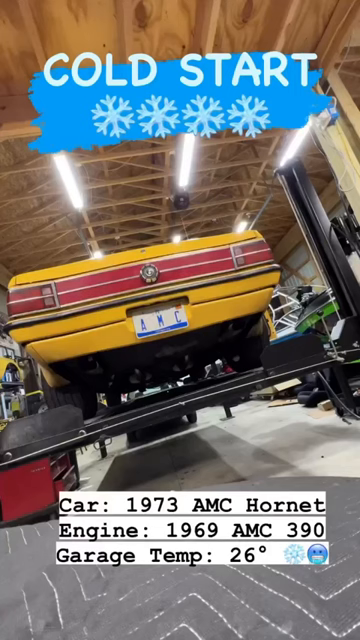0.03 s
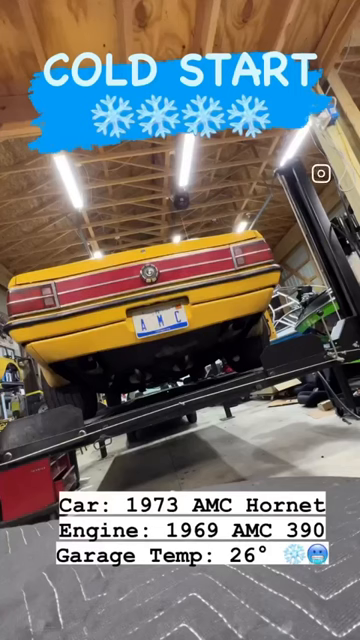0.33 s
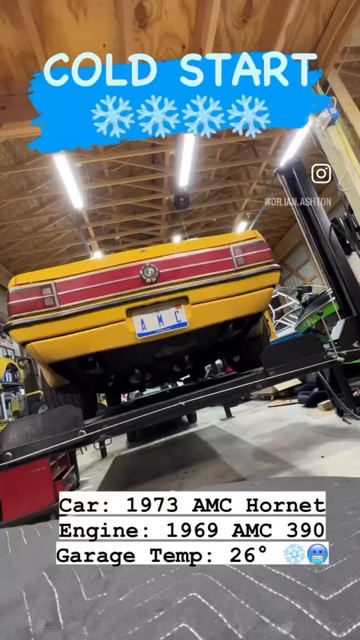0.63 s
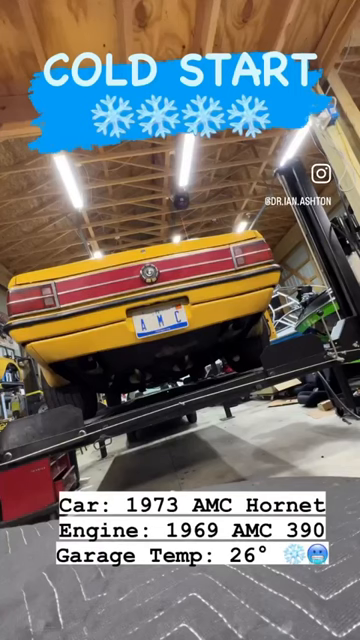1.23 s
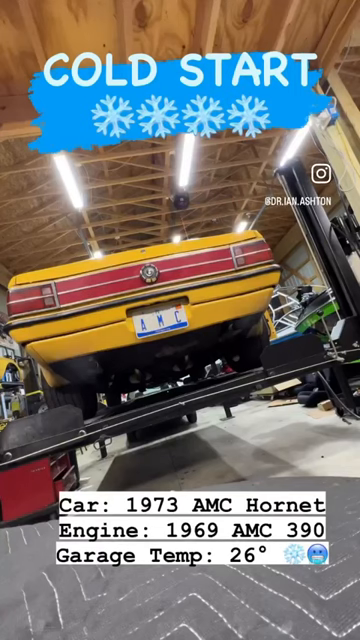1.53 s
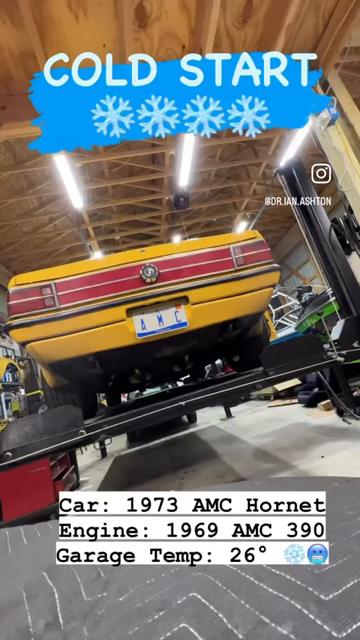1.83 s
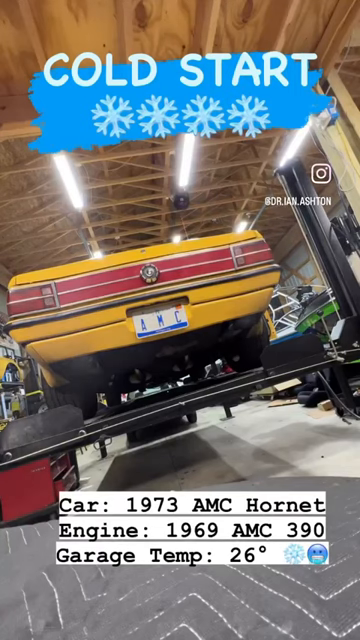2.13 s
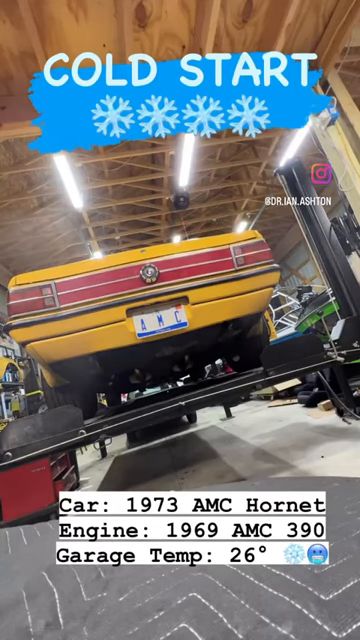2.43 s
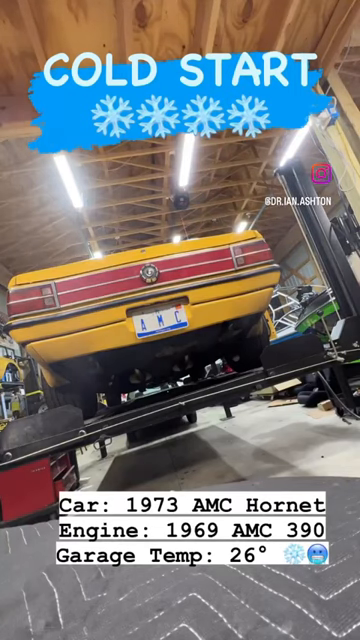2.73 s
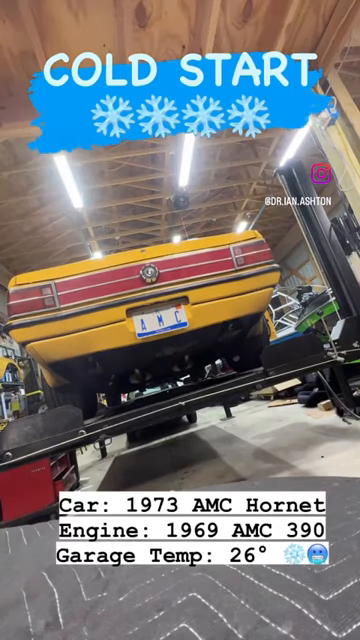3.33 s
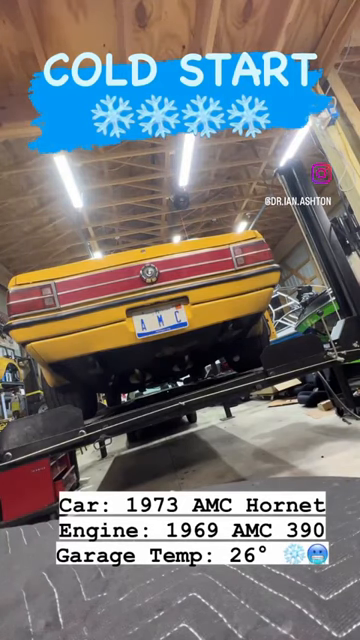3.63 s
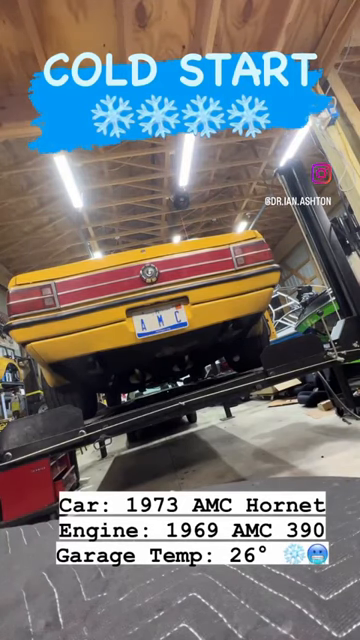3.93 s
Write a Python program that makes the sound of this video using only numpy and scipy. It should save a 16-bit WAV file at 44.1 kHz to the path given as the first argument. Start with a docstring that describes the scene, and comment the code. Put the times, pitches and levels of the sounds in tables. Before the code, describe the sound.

A big car engine cranks, catches and settles into a loud, lumpy idle in a garage.

```python
"""Cold V8 starting in a garage

Heard from behind the tailpipes, the starter's switch (the solenoid) clacks, and the starter whines in
surges as it pushes against the air squeezed in the cylinders. The engine catches, stumbles and settles
into a lumpy fast idle. Each firing thumps down the pipes with a bark and a hiss of gas; some bang out,
and sharp ticks come between."""
import sys
import numpy as np
from scipy import signal
from scipy.fft import rfft, irfft
from scipy.io import wavfile
from scipy.ndimage import uniform_filter1d, map_coordinates

SR = 44100
rng = np.random.default_rng(int(sys.argv[2]) if len(sys.argv) > 2 else 0)


def store_wav(level_fs):
    """Save 16-bit WAV to argv[1]."""
    pcm = np.round(np.clip(np.atleast_2d(level_fs), -1, 1) * 32767)
    wavfile.write(sys.argv[1], SR, pcm.T.astype(np.int16))


N = 176400
T = np.arange(N) / SR
FREQ = np.maximum(np.arange(N + 1) * SR / (2 * N), 1.)

# How fast the cylinders fire once the engine idles: time_s, firings_per_s
IDLE_RATE = [(1.72, 52.31), (1.87, 63.48), (2.0, 67.08), (2.2, 64.9), (2.38, 71.01), (2.52, 66.56),
             (2.72, 66.96), (2.87, 70.13), (3.0, 68.79), (3.15, 72.64), (3.35, 70.78), (3.48, 66.76),
             (3.62, 74.07), (3.75, 72.08), (3.87, 68.77), (4.0, 73.1)]


def undb(db):
    """Turn decibels into a gain to multiply by."""
    return 10 ** (np.asarray(db) / 20)


def unit(x):
    """Scale a signal to an average (rms) level of 1."""
    return x / np.sqrt(np.mean(x ** 2) + 1e-18)


def curve(rows, column=1):
    """Join one column of a table by straight lines in time."""
    rows = np.array(rows)
    return np.interp(T, rows[:, 0], rows[:, column])


def fader(rows, column=1):
    """Gain that follows a dB column from the first row until just after the last, silent elsewhere."""
    is_on = (T >= rows[0][0]) & (T <= rows[-1][0] + .03)
    return undb(curve(rows, column)) * uniform_filter1d(1. * is_on, size=200)


def per_hz(points):
    """Join (Hz, value) points, giving every octave the same room."""
    hz, value = np.array(points).T
    return np.interp(np.log(FREQ), np.log(hz), value)


def shape(x, response):
    """Filter a signal with one gain for each frequency."""
    return irfft(rfft(x, 2 * N) * response)[..., :N]


def colour(x, points):
    """Filter through (Hz, dB) points so that the peaks ring after a blow, never before it."""
    cepstrum = irfft(np.log(undb(per_hz(points))))
    one_sided = np.r_[cepstrum[0], 2 * cepstrum[1:N]]
    return shape(x, np.exp(rfft(one_sided, 2 * N)))


def resonance(hz, width):
    """Response of something that rings at one pitch, with gain 1 at that pitch."""
    return 1 / (1 + 1j * (FREQ ** 2 - hz ** 2) / (FREQ * width))


def noise(side_db):
    """Stereo noise, alike in both ears in the bass and the very top; more side_db makes it wider."""
    mid, side = rng.standard_normal((2, N))
    side = shape(side, undb(side_db) * FREQ / np.hypot(FREQ, 500) / (1 + (FREQ / 12900) ** 4))
    return np.array([mid + side, mid - side])


def wander(rate_hz):
    """A smooth random wobble with a typical size of 1."""
    window = int(SR / rate_hz)
    return unit(uniform_filter1d(uniform_filter1d(rng.standard_normal(N), window), window))


def strikes(times, sizes):
    """A single click at each time."""
    return np.bincount(np.clip(times * SR, 0, N).astype(int), sizes, N + 1)[:N]


def puffs(times, levels_db, decay_s, steady, rise_s=.0023):
    """A gas flow that swells at each time and dies back to a steady stream."""
    swell = signal.lfilter([1], [1, -np.exp(-1 / (rise_s * SR))], strikes(times, undb(levels_db)))
    flow = signal.lfilter([1], [1, -np.exp(-1 / (decay_s * SR))], swell)
    return unit(unit(flow) + steady)


def garage(x, echo_db=-2, echo_s=.37):
    """The direct sound plus a short echo from walls and floor, mostly above the bass."""
    tail = noise(side_db=-3) * undb(-60 * T / echo_s) * (T > .005)
    tail /= np.sqrt(np.sum(tail ** 2) / 2)
    echo_gain = undb(echo_db) * FREQ ** 2 / (FREQ ** 2 + 308 ** 2)
    return shape(x, (1 + echo_gain * rfft(tail, 2 * N)) / np.hypot(1, echo_gain))


def room_rumble():
    """The faint, steady, low noise of the room."""
    # Tone of the room's air: frequency_hz, level_db
    tone = [(15, -60), (25, -24), (43, -4), (124, -0.5), (156, -12), (323, -13), (527, -19.5), (839, -19),
            (1870, -40), (12000, -64), (15600, -94), (22000, -120)]
    return undb(-56) * unit(colour(noise(side_db=1), tone))


def clacks():
    """The solenoid pulls in, then the starter's small gear hits the engine's big one; the metal rattles."""
    # The blows: start_s, level_db, decay_s, tilt_db_per_octave
    blows = [(0.551, -31.5, 0.19, 2), (0.617, -24.5, 0.022, -1.5), (0.631, -17, 0.1, -5.5)]
    # Tone of the rattle: frequency_hz, level_db
    tone = [(35, -75), (60, -22), (282, -15), (526, 0.5), (591, -2), (727, 4.5), (835, 1), (1560, -3.5),
            (1710, -7.5), (2980, -4), (3840, -17), (4210, -15.5), (15000, -34)]
    # Ringing of the solenoid and small gear: pitch_hz, width_hz, level_db
    rings = [(1150, 200, -5), (2950, 170, -2), (4200, 130, 6)]
    ringing = 1 + sum(undb(db) * resonance(hz, width) for hz, width, db in rings)
    out = 0
    for start_s, level_db, decay_s, tilt_db in blows:
        tilted = [(hz, db + tilt_db * np.log2(hz)) for hz, db in tone]
        rattle = unit(shape(colour(noise(side_db=-5.5), tilted), ringing))
        out = out + undb(level_db) * rattle * (T >= start_s) * np.exp(-abs(T - start_s) / decay_s)
    return out


def starter():
    """Gear teeth whine in surges and ring the housing, while the unfired cylinders pump air."""
    # Whine of the gear teeth: time_s, pitch_hz, level_db
    surges = [(.62, 850, -56), (.675, 923, -22), (.685, 970, -12.5), (.74, 1030, -17), (.79, 1103, -8),
              (.822, 1096, -8), (.838, 1057, -46), (.852, 996, -23), (.875, 882.7, -25), (.9, 836, -15.5),
              (.99, 814.8, -26), (1.003, 1236, -13), (1.022, 1253, -22.5), (1.046, 1165, -29),
              (1.063, 1090, -9), (1.095, 1028, -25.5), (1.12, 1000, -26), (1.16, 1357, -26),
              (1.2, 1263, -14.5), (1.213, 1157, -28), (1.226, 1080, -7.5), (1.238, 1043, -19.5),
              (1.275, 995, -32), (1.34, 1073, -21), (1.38, 1000, -33)]
    # Overtones of the whine: pitch_multiple, level_db
    tooth_overtones = [(2, -8.5), (3, -8.5), (4, -12)]
    # Loudness of the gears' rasp and overtones: time_s, level_db
    rasp_level = [(.605, -70), (.622, -30), (.632, -20), (.69, -20.5), (.78, -19), (.9, -21.5),
                  (1.0, -22.5), (1.2, -20), (1.29, -21), (1.345, -17.5), (1.42, -32), (1.5, -52)]
    # Tone of the rasp: frequency_hz, level_db
    rasp_tone = [(40, -34), (120, -20.5), (350, -14.5), (520, -2.5), (700, -6.5), (1000, 3.5), (1130, -8),
                 (1420, -7.5), (1650, -13), (2400, -10.5), (3100, -9.5), (3900, -16), (5000, -18),
                 (6300, -17.5), (8000, -23), (11500, -21), (15000, -33.5)]
    # Loudness of the pumping: time_s, level_db
    pump_level = [(.61, -70), (.66, -43), (.72, -33), (.77, -27), (.87, -48), (.95, -35.5), (1.1, -39),
                  (1.2, -53), (1.3, -41), (1.36, -62)]
    # Ringing of the flywheel and its housing: pitch_hz, width_hz, level_db
    rings = [(1070, 64, 6), (1630, 46, 0), (2150, 130, -8), (3015, 62, -7), (3080, 49, -16)]
    tooth_phase = 2 * np.pi * np.cumsum(curve(surges) * (1 + .013 * wander(250))) / SR
    load = fader(surges, column=2) * undb(3 * wander(250))
    whine = np.sin(tooth_phase) * load * undb([[-3.5], [2.5]])  # louder on the right
    steadier_phase = 2 * np.pi * np.cumsum(curve(surges) * (1 + .004 * wander(250))) / SR
    overtones = fader(rasp_level) * sum(undb(db) * np.sin(k * steadier_phase) for k, db in tooth_overtones)
    grind = (1 + .7 * np.sin(tooth_phase)) * undb(2 * wander(360))  # swells with each tooth
    rasp = unit(colour(noise(side_db=-4) * grind, rasp_tone)) * fader(rasp_level) * undb(-4)
    pump_hz = 59 * (1 + .078 * wander(30.2))
    pump = np.sin(2 * np.pi * np.cumsum(pump_hz) / SR) * fader(pump_level)
    housing = shape(overtones + rasp, sum(undb(db) * resonance(hz, width) for hz, width, db in rings))
    return garage(whine, echo_db=-2.5) + garage(rasp + housing + pump)


def ticks(decay_s=.002, width_hz=1000, faint_per_s=14, faint_db=-28):
    """Brief metal ticks, each ringing at its own pitch and a shared one; fainter ones fall by chance."""
    # The sharp ticks: start_s, level_db, pitch_hz
    sharp = [(1.838, -19, 6300), (1.902, -23, 6600), (1.978, -21, 7700), (2.096, -23, 6600),
             (2.220, -21, 9300), (2.380, -18, 9100), (2.395, -19, 6700), (2.497, -22, 6400),
             (2.525, -24, 9200), (2.587, -22, 8600), (2.632, -21, 6400), (2.691, -22, 9200),
             (2.735, -24, 6300), (2.811, -21, 7300), (2.840, -21, 8300), (2.870, -22, 6800),
             (3.041, -24, 9400), (3.207, -22, 6600), (3.263, -25, 6700), (3.375, -23, 8300),
             (3.419, -18, 9200), (3.552, -20, 7100), (3.827, -23, 6400), (3.873, -24, 8800)]
    shared_hz, shared_db = 6240, -14
    out, grit = np.zeros((2, N)), noise(side_db=-20)
    idle_start_s, pitches = IDLE_RATE[0][0], np.array(sharp)[:, 2]
    idle_s = T[-1] - idle_start_s
    faint = [(idle_start_s + when * idle_s, faint_db, pitches.min() + height * np.ptp(pitches))
             for when, height in rng.random((int(faint_per_s * idle_s), 2))]
    for start_s, level_db, pitch_hz in sharp + faint:
        span = (T >= start_s) & (T < start_s + .03)
        burst = grit[:, span] * np.exp((start_s - T[span]) / decay_s)
        for ring_hz, ring_db in (pitch_hz, 0), (shared_hz, shared_db):
            ring = signal.iirpeak(ring_hz, ring_hz / width_hz, SR)
            out[:, span] += undb(level_db + ring_db) * signal.lfilter(*ring, signal.lfilter(*ring, burst))
    return out * undb(1) * np.sqrt(SR / np.pi / width_hz)  # makes up for the narrow filters


def gas_hiss(times, levels_db, split_hz=4910):
    """Gas rushes out at each firing: a lower rasp and a higher hiss, each with its own loudness."""
    # Tone of the rushing gas: frequency_hz, level_db
    tone = [(500, -22), (1300, -1.5), (2100, -4), (3000, -1), (3900, 1.5), (5000, -2.5), (6400, 3),
            (7400, -1), (9200, -3), (9900, -5), (11500, -3.5), (15500, -7)]
    # Loudness of the lower, rasping part: time_s, level_db
    rasp_level = [(1.32, -35), (1.37, -23.5), (1.4, -29), (1.52, -29), (1.6, -34.5), (1.7, -38.5),
                  (1.75, -33.5), (1.84, -34), (1.89, -37), (1.93, -34), (1.97, -40.5), (2.03, -32.5),
                  (2.08, -39.5), (2.13, -35), (2.21, -40.5), (2.33, -33.5), (2.4, -39), (2.44, -37.5),
                  (2.55, -39.5), (2.62, -39.5), (2.65, -36), (2.73, -37.5), (2.87, -36.5), (3.03, -43),
                  (3.08, -35.5), (3.16, -36), (3.25, -46), (3.29, -36.5), (3.38, -36), (3.48, -44),
                  (3.57, -36.5), (3.61, -40.5), (3.72, -36), (3.82, -42), (3.9, -39), (4, -36.5)]
    # Loudness of the higher, hissing part: time_s, level_db
    hiss_level = [(1.32, -37), (1.37, -20.5), (1.43, -26.5), (1.53, -30.5), (1.62, -37.5), (1.66, -40),
                  (1.71, -39), (1.76, -30.5), (1.84, -31), (1.89, -35), (2.04, -32.5), (2.08, -35),
                  (2.16, -31.5), (2.21, -37.5), (2.33, -31.5), (2.44, -36.5), (2.54, -34), (2.76, -34),
                  (2.83, -32.5), (3.02, -38.5), (3.06, -34.5), (3.16, -34), (3.25, -38), (3.29, -35.5),
                  (3.38, -30.5), (3.48, -42), (3.56, -33), (3.61, -38), (3.74, -35), (3.81, -39.5),
                  (3.86, -37.5), (3.93, -37), (4, -33)]
    gas = unit(colour(noise(side_db=-6.5) * puffs(times, levels_db, decay_s=.012, steady=.082), tone))
    low_pass = 1 / (1 + (FREQ / split_hz) ** 10)
    rasp = unit(shape(gas, low_pass)) * fader(rasp_level)
    hiss = unit(shape(gas, 1 - low_pass)) * fader(hiss_level)
    return rasp + undb(-.5) * hiss


def gas_bark(times, levels_db):
    """Each firing pushes out a short, throaty puff of gas."""
    # Tone of the bark: frequency_hz, level_db
    tone = [(60, -13.5), (150, 4), (320, -4.5), (400, -6), (480, -1.5), (720, -6), (950, -16.5),
            (1200, -24), (1600, -24), (2200, -53), (6000, -45)]
    # Loudness of the bark: time_s, level_db
    level = [(1.33, -22), (1.35, -27), (1.39, -17), (1.57, -22), (1.58, -34), (1.63, -26), (1.69, -38),
             (1.78, -22), (1.95, -26.5), (1.96, -28), (2.01, -19), (2.03, -26), (2.05, -24), (2.11, -25),
             (2.16, -19.5), (2.21, -32), (2.29, -19.5), (2.41, -23), (2.44, -32), (2.54, -24), (2.56, -29),
             (2.61, -21), (2.71, -32), (2.76, -21.5), (2.78, -32), (2.82, -18.5), (2.86, -23.5),
             (3.05, -31.5), (3.08, -30), (3.11, -31), (3.14, -19.5), (3.26, -35.5), (3.34, -25),
             (3.36, -35.5), (3.58, -25.5), (3.63, -45), (3.66, -26), (3.96, -30), (3.98, -31), (4.0, -41)]
    gas = noise(side_db=-4) * puffs(times, levels_db, decay_s=.0064, steady=.26)
    return undb(1) * unit(colour(gas, tone)) * fader(level)


def pipe_thumps(times, levels_db):
    """Each firing's pressure pulse makes the exhaust pipes ring at their low pitches."""
    # Tone of the pipes: frequency_hz, level_db
    tone = [(20, -24), (42, -5.5), (66, -1), (86, 3.5), (103, -14), (122, 9), (140, 3), (156, 3.5),
            (193, 4.5), (215, -10), (243, 6.5), (280, -10), (312, 3), (400, -23), (470, -7.5), (570, -17),
            (740, -19.5), (1000, -23.5), (1600, -55), (5000, -80.5)]
    # Low notes of the garage that hold each thump back and smear it: pitch_hz, width_hz
    room_notes = [(122, 22), (185, 26), (245, 24), (308, 30), (458, 36), (565, 40)]
    # Loudness of the thumps while the engine catches: time_s, level_db
    catch_level = [(1.33, -36), (1.368, -12), (1.41, -10.5), (1.47, -11), (1.495, -15), (1.53, -12.5),
                   (1.605, -27), (1.635, -21), (1.69, -24), (1.735, -14), (1.82, -11.5), (1.88, -13.5)]
    # Loudness of the thumps at idle: time_s, level_db
    idle_level = [(1.9, -14), (1.96, -17.5), (2.02, -16), (2.09, -22), (2.15, -8.5), (2.21, -21.5),
                  (2.29, -17), (2.37, -17.5), (2.4, -17.5), (2.47, -20.5), (2.51, -16), (2.64, -20),
                  (2.65, -21), (2.7, -23), (2.75, -13.5), (2.84, -17.5), (2.85, -20), (2.96, -22),
                  (3.0, -18.5), (3.02, -24), (3.16, -16), (3.18, -21), (3.24, -21), (3.27, -19),
                  (3.29, -27), (3.37, -19.5), (3.44, -20), (3.63, -22.5), (3.68, -16), (3.71, -23),
                  (3.74, -19), (3.79, -26), (3.91, -13.5), (3.96, -22), (3.98, -16), (4.0, -18)]
    thumps = colour(strikes(times, undb(levels_db)), tone)
    thumps = shape(thumps, np.prod([1 - 2 * resonance(hz, width) for hz, width in room_notes], axis=0))
    drift_s = .0009 * wander(14)  # gusts of hot gas bend the pipes' pitches
    thumps = map_coordinates(thumps, [(T + drift_s) * SR], order=1)
    return undb(.5) * thumps / np.std(thumps[N // 2:]) * fader(catch_level + idle_level)


def engine(cycle_start_s=1.7325, jitter_s=.0007, thump_scatter_db=2, gas_scatter_db=1.5):
    """Eight unequal cylinders fire in turn into the pipes: a thump, a bark and a hiss for each."""
    # How fast the cylinders fire while the engine catches: time_s, firings_per_s
    catch_rate = [(1.3, 34), (1.37, 41.43), (1.41, 55.4), (1.45, 71.8), (1.54, 73.75), (1.63, 62.2)]
    # The cylinders in firing order: thump_delay_ms, thump_db, bark_db, hiss_db
    cylinders = [(0.51, 4.5, -1, 21), (0.48, 3.5, -3.5, 19.5), (1.97, 3, -2, 20), (2.7, 2.5, -2.5, 16.5),
                 (0.44, 2, 4.5, 22.5), (2.5, 0.5, -27, 21.5), (1.6, -9.5, 1, 6), (2.08, 3, -0.5, 22)]
    # Single firings, most of them heavy, that bang out of the rumble: start_s, level_db
    bangs = [(1.366, 5.5), (1.389, 3), (1.409, -14), (1.426, 4), (1.452, 2.5), (1.467, -0.5), (1.519, 4),
             (1.529, -9), (1.627, 4), (1.733, 5), (1.771, 4.5), (1.808, 2), (1.843, 1.5), (2.005, 4),
             (2.043, 7.5), (2.129, -1.5), (2.159, -1.5), (2.296, -1.5), (2.513, 2.5), (2.737, 1),
             (2.797, 1.5), (2.926, -1.5), (3.068, 7.5), (3.139, 2.5), (3.291, 6), (3.42, 4.5), (3.676, 3.5),
             (3.885, 1), (3.975, 5)]
    # How the exhaust leans to one ear: frequency_hz, left_minus_right_db
    balance = [(60, 0.5), (110, -3), (200, -1), (380, -6.5), (700, -3.5), (1290, -1.0), (2380, 3),
               (4400, -0.5), (8120, 0.5), (15000, 0.0)]
    count = np.cumsum(curve(catch_rate + IDLE_RATE)) / SR  # goes up by one for each firing
    count -= np.interp(cycle_start_s, T, count)
    firings = np.arange(np.floor(count[-1]), count[0], -1).astype(int)
    delay_ms, thump_db, bark_db, hiss_db = np.array(cylinders)[firings % len(cylinders)].T
    time_chance, force_chance, gas_chance = np.sqrt(3) * rng.uniform(-1, 1, (len(firings), 3)).T
    times = np.interp(firings, count, T) + jitter_s * time_chance
    arrivals = times + delay_ms / 1000
    thump_db = thump_db + thump_scatter_db * force_chance
    gas_db = gas_scatter_db * (force_chance + gas_chance) / np.sqrt(2)
    for start_s, level_db in bangs:  # each takes the place of the nearest firing
        nearest = np.argmin(abs(times - start_s))
        times[nearest] = arrivals[nearest] = start_s
        thump_db[nearest], bark_db[nearest] = level_db, level_db + 1.5
    thumps = pipe_thumps(arrivals, thump_db)
    exhaust = thumps + gas_bark(times, bark_db + gas_db) + gas_hiss(times, hiss_db + gas_db)
    return shape(exhaust, undb(np.outer([.5, -.5], per_hz(balance))))


def scene():
    """The car in the garage over a faint room rumble."""
    return starter() + garage(engine() + clacks()) + garage(ticks(), echo_db=-6) + room_rumble()


def record(dry, ceiling=.95, top_hz=15900):
    """Round off the loudest peaks and cut the highest treble."""
    rounded = dry / (1 + (dry / ceiling) ** 4) ** .25
    return signal.sosfilt(signal.ellip(10, .2, 80, top_hz, fs=SR, output="sos"), rounded)


dry = scene()
out = record(dry)
store_wav(out)
```